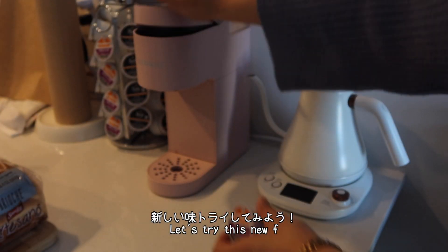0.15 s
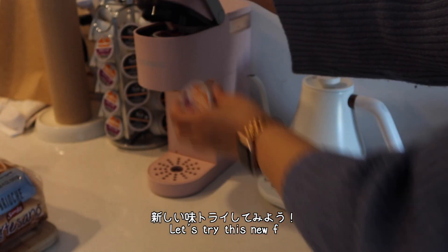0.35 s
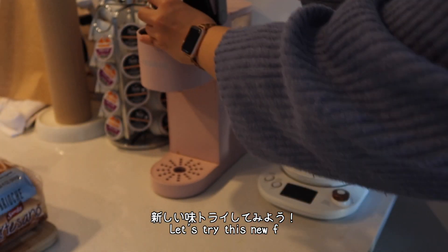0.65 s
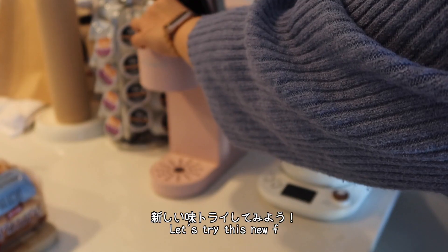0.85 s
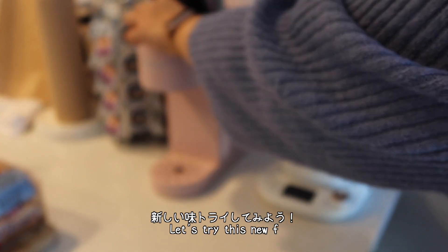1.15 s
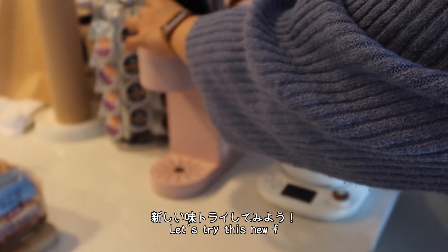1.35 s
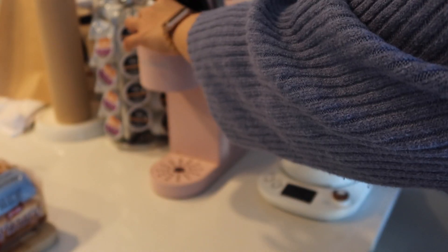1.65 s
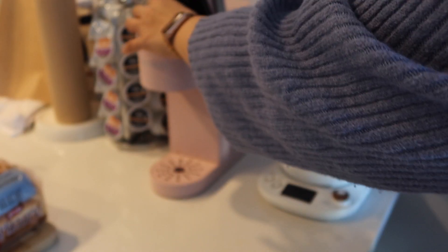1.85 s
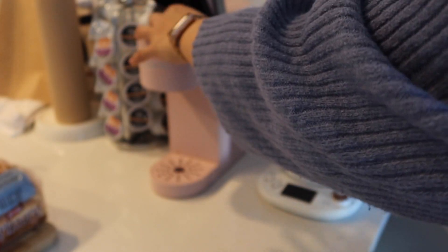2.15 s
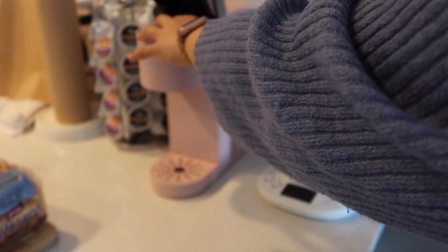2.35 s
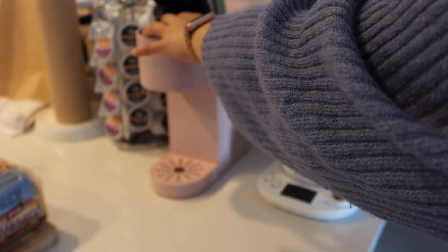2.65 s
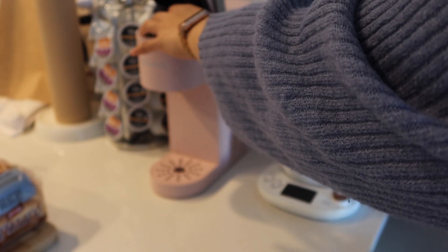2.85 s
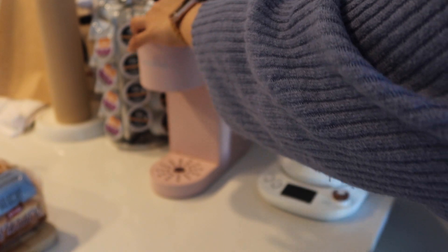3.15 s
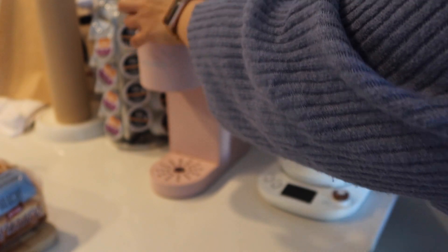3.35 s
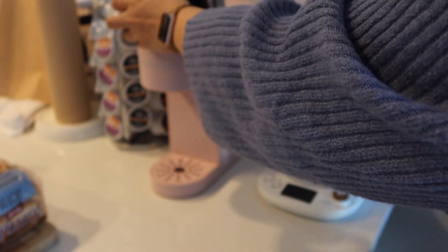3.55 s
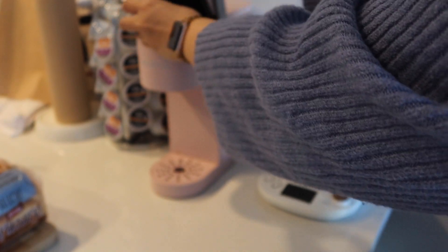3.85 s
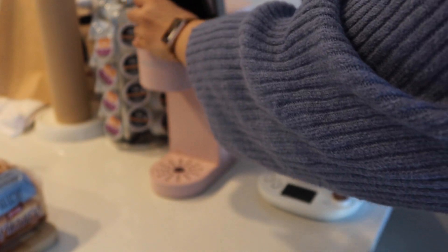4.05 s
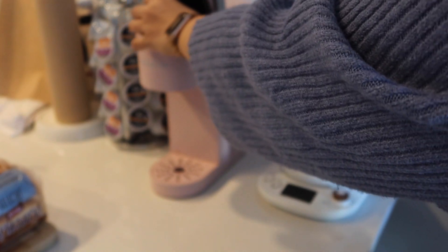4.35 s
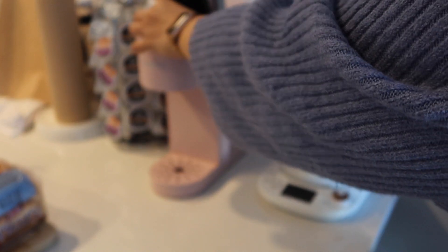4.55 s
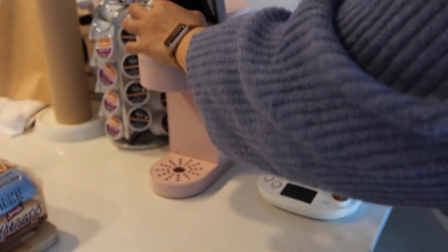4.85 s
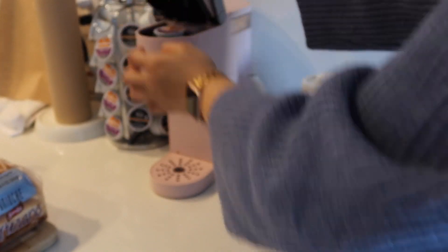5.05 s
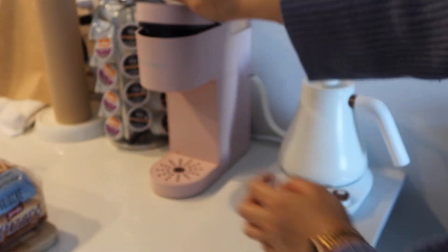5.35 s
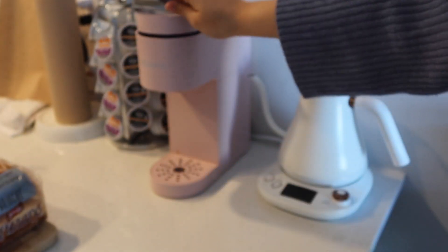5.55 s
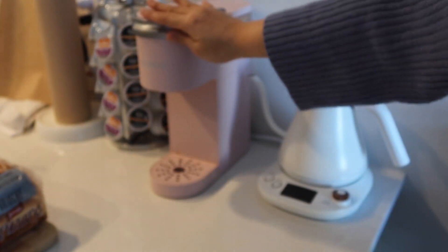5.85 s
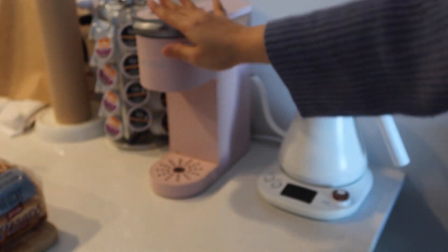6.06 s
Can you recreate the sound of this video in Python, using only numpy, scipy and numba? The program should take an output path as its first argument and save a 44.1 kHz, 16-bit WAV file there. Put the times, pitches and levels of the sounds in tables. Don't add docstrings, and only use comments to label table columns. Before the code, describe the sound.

Quiet low room hum in a hard-walled kitchen, stereo microphones about arm's length away. Faint plastic ticks start at once; at 0.1-0.3 s a loose lid rattles and slides over a hollow housing. At 0.6 s a clack, then at 0.7 s a strong dull thump as the lid is thrown open; its tail is chopped at about 0.75 s. Thin pod clicks and taps at 1.0-1.3 s, a soft knock near 1.6, then near quiet with faint ticks until 2.7. At 3.03 s the pod drops with a loud hollow knock, bouncing at 3.18 and 3.28. Light working taps follow at 3.4, 3.8-3.95, 4.2 and 4.65 s. Lid parts click sharply at 5.3-5.55, slide and thump at 5.7, and the latch snaps at 5.77 s, the loudest event, bright and brief, its short reverberant tail fading into hum.

```python
import sys
import numpy as np
from scipy import signal
from scipy.fft import rfft, irfft
from scipy.io import wavfile
from scipy.ndimage import uniform_filter1d
from numba import njit

SR = 44100
rng = np.random.default_rng(int(sys.argv[2]) if len(sys.argv) > 2 else 0)


def bounce(signal):
    frames = np.transpose(np.atleast_2d(signal))
    limited = np.clip(frames, -1, 1)
    pcm = np.round(limited * 32767).astype(np.int16)
    wavfile.write(sys.argv[1], SR, pcm)


def natural_amplitude(level_db):
    exponent = np.asarray(level_db, float) / 20
    return 10 ** exponent


N = 274302
T = np.arange(N) / SR


def shape(x, table):
    hz, db = np.transpose(table)
    f = np.fft.rfftfreq(len(x), 1 / SR) + 1
    return irfft(rfft(x) * natural_amplitude(np.interp(np.log(f), np.log(hz), db)), len(x))


def band(x, hz, width):
    return signal.lfilter(*signal.iirpeak(hz, hz / width, SR), x)


def unit(x):
    return x / np.sqrt(np.mean(x ** 2))


def walk(rate):
    k = int(SR / rate)
    steps = np.repeat(rng.standard_normal(N // k + 1), k)
    return 0.57 * uniform_filter1d(uniform_filter1d(steps, k), k)[:N]


def add(track, s, sound):
    i = int(s * SR)
    track[i:i + len(sound)] += sound[:N - i]


# f/Hz, level/dB per Hz
AIR = [(15, -50), (25, 6), (69, -8), (110, -8), (209, -7.5), (240, -10), (297, -3.5), (331, -16),
       (368, -8.5), (495, -15.5), (782, -17.5), (1170, -21), (1410, -22.5), (5010, -32.5), (15500, -50.5)]
# f/Hz, side minus mid level/dB
AIR_SIDE = [(60, -29), (110, -11), (200, -9.5), (380, -2.5), (700, -3.5), (1290, -1), (2380, -0.5),
            (4400, -1), (8120, -1), (15000, -1)]
# t/s, level/dB, width/s
SWELLS = [
    (0., -34, .08),
    (.9, -32.5, 0.3),
    (2.96, -52.5, 0.32),
    (4.97, -47, 0.2),
    (5.82, -59, 0.059),
]


def air():
    air_db, throb_db = -45, -56.5
    mid, side = (shape(rng.standard_normal(N), AIR) for _ in range(2))
    both = np.array([mid, shape(side, AIR_SIDE)])
    swell, out = walk(1.0), 0
    f = np.fft.rfftfreq(N, 1 / SR) + 1
    centres = np.arange(4, 14.6, .5)
    for k in range(len(centres)):
        share = np.interp(np.log2(f), centres, np.arange(len(centres)) == k)
        drift_db = 0.092 * swell + 0.43 * walk(5.5)
        out = out + irfft(rfft(both) * share, N) * natural_amplitude(drift_db)
    out = out * natural_amplitude(air_db) / np.sqrt(np.mean(out[0] ** 2))
    throb_hz = 75 + 4 * walk(2.2)
    throb = np.sqrt(2) * np.sin(2 * np.pi * np.cumsum(throb_hz) / SR) * natural_amplitude(0.62 * walk(7.93))
    swells = sum(natural_amplitude(db - 12.5) * np.exp(-((T - s) / width) ** 2) for s, db, width in SWELLS)
    out[0] += throb * (natural_amplitude(throb_db) + swells)
    return out


# f/Hz, t60/s, level/dB
KITCHEN = [(125, 0.53, -2), (263, 0.68, -11.5), (435, 0.52, -5), (1000, 0.49, -5.5), (2000, 0.48, -9),
           (3700, 0.51, -11), (7440, 0.35, -11.5), (13800, 0.17, -24)]
# f/Hz, side minus mid level/dB
KITCHEN_SIDE = [(100, -46), (1000, -27), (3000, -13.5), (8000, 1), (15000, 19)]


def kitchen(x):
    t, f = T[:SR], np.fft.rfftfreq(SR, 1 / SR) + 1
    centres = np.log([row[0] for row in KITCHEN])
    tails = np.zeros((2, SR))
    for k, (hz, t60, db) in enumerate(KITCHEN):
        share = np.interp(np.log(f), centres, np.arange(len(centres)) == k)
        noise = irfft(rfft(rng.standard_normal((2, SR))) * np.sqrt(share), SR)
        tails += noise * natural_amplitude(db - 24.0 - 60 * t / t60)
    tails *= np.clip(t / .02, 0, 1)
    tails *= natural_amplitude(3 * walk(250)[:SR] * np.exp(-t / .12))
    spectrum = rfft(tails)
    power = np.abs(spectrum) ** 2
    even = np.sqrt(uniform_filter1d(power, size=160) / uniform_filter1d(power, size=12))
    tails = irfft(spectrum * even, SR)
    tails[1] = shape(tails[1], KITCHEN_SIDE)
    return signal.fftconvolve(x[None], tails, axes=1)[:, :N]


# f/Hz, width/Hz, level/dB
HOUSING = [(236, 68, 2.5), (500, 52, -11.5), (756, 48, -2)]
# start t/s, peak t/s, end t/s, level/dB, brightness level/dB
SLIDES = [(-.02, 0.014, 0.078, -38.5, -5.5), (0.037, 0.051, 0.18, -34.5, -23),
          (0.077, 0.17, 0.3, -15, -20.5), (0.297, 0.543, 0.53, -35.5, -30), (.59, 0.644, 0.65, -33, -9),
          (0.692, 0.714, 0.7, -14, 3), (0.89, 1.054, 1.09, -36, -10), (1.063, 1.117, 1.3, -29.5, -18),
          (1.248, 1.577, 1.66, -35.5, -65), (3.26, 3.28, 3.49, -29.5, -22),
          (3.368, 3.388, 3.54, -31.5, -35), (3.816, 3.921, 3.94, -31.5, -50),
          (4.124, 4.175, 4.13, -33, -25), (4.53, 4.544, 4.58, -35.5, -20), (5.403, 5.455, 5.7, -23, -38),
          (5.694, 5.733, 5.75, -10, -40)]


def slides():
    slips = (rng.random(N) < 2500 / SR) * rng.standard_normal(N)
    slips = slips * natural_amplitude(1.64 * rng.exponential(size=N))
    slips = slips + 0.13 * rng.standard_normal(N)
    modes = [(-1) ** k * natural_amplitude(db) * band(slips, hz, 1.66 * w) for k, (hz, w, db) in enumerate(HOUSING)]
    body = unit(sum(modes))
    broad = unit(band(slips, 1000, 670))
    scratch = unit(band(band(slips, 2200, 6800), 3100, 5200))
    out = np.zeros(N)
    for start, peak, end, db, bright_db in SLIDES:
        rise_and_fall = np.interp(T, [start, peak, end], [0, 1, 0]) ** 2
        out += natural_amplitude(db - 11.5) * rise_and_fall * (body + 0.19 * broad + natural_amplitude(bright_db) * scratch)
    return out


def rings(table, push_cycles=0.36, split=0.037):
    out, t = np.zeros(N), T[:16384]
    for s, db, hz, t60 in table:
        trio = np.sin(2 * np.pi * hz * t)
        trio += 0.3 * np.sin(2 * np.pi * hz * (1 + split) * t)
        trio += 0.18 * np.sin(2 * np.pi * hz * (1 - 2.0 * split) * t)
        decay = natural_amplitude(db - 1.5 - 60 * t / max(t60, .004))
        add(out, s, decay * trio * (1 - np.exp(-t * hz / push_cycles)))
    return out


def struck(modes, hits):
    return rings([(s, db + peak_db, hz, t60) for s, db in hits for hz, peak_db, t60 in modes])


# t/s, peak level/dB, f/Hz
BOOMS = [
    (.166, -26.5, 251),
    (3.032, -38, 125),
    (3.421, -35, 135.4),
    (4.167, -34.5, 184.7),
    (5.773, -18, 396.7),
    (5.779, -25, 115),
]
# t/s, peak level/dB, f/Hz
HELD_THUMPS = [
    (.189, -14.5, 475),
    (.705, -3.5, 240),
    (.723, -15, 193),
    (1.157, -21.5, 212),
    (3.961, -21.5, 187),
    (4.653, -29.5, 193),
    (4.66, -22.5, 377),
]
# t/s, peak level/dB, f/Hz
FREE_THUMPS = [(.057, -26.5, 303), (.216, -28, 283), (.612, -17, 244), (.629, -22, 222), (.74, -23.5, 272),
               (1.125, -26.5, 388), (1.435, -30, 295), (3.03, -8.5, 415.6), (3.043, -16, 365),
               (3.188, -14, 397.4), (3.4, -31, 378), (3.775, -32.5, 214), (3.935, -27.5, 129),
               (5.453, -23, 436), (5.559, -27, 128), (5.711, -16.5, 268), (5.72, -12, 187),
               (6.118, -28, 182)]


def thumps():
    kinds = [(HELD_THUMPS, 0.037), (FREE_THUMPS, 0.092), (BOOMS, 0.23)]
    return rings([row + (t60,) for rows, t60 in kinds for row in rows], 0.43, -0.118)


# t/s, peak level/dB, f/Hz, t60/s
POD_RINGS = [(1.001, -17, 2000, 0.0056), (1.001, -26, 1240, 0.018), (1.003, -28, 672, 0.051),
             (1.113, -34, 3460, .025), (1.153, -20.5, 1206, .035), (1.155, -23, 1410, .03),
             (1.003, -27.5, 1170, 0.026), (1.153, -25.5, 2690, 0.033), (1.155, -32, 2830, .05),
             (1.583, -30.5, 653, 0.026), (3.389, -23, 1196, 0.025), (3.389, -26, 2000, .012),
             (3.773, -35, 556, .038), (3.962, -26.5, 554, 0.039), (4.158, -31, 1000, 0.014),
             (4.223, -14, 1126, 0.019), (4.224, -15.5, 2010, 0.003), (4.23, -30.5, 1230, 0.18),
             (4.649, -21, 1212, 0.048), (4.652, -26, 2860, 0.031), (4.653, -38, 3130, .02),
             (4.226, -30, 2500, 0.02), (4.655, -29.5, 1259, 0.2), (4.656, -37.5, 2943, 0.12),
             (4.655, -30, 610, 0.031)]


def pod():
    return rings(POD_RINGS)


# f/Hz, peak level/dB, t60/s
CUP_MODES = [(860, -15, 0.077), (662, -10, 0.012), (1480, -22.5, 0.049), (1230, -22, 0.063),
             (2430, -18, 0.0041)]
# t/s, level/dB
CUP_HITS = [
    (3.027, 2.2),
    (3.181, -6),
    (3.28, -15),
]


def cup():
    return struck(CUP_MODES, CUP_HITS)


# t/s, peak level/dB, f/Hz, t60/s
LID_RINGS = [(0, -45, 2560, 0.066), (0, -48, 5330, .09), (.106, -30.5, 3190, .024), (.2, -21, 3100, 0.015),
             (.2, -20, 6050, .017), (.606, -16.5, 860, 0.025), (.705, -9.5, 783, 0.028),
             (.7055, -3.5, 298, 0.0065), (5.294, -21, 1000, 0.05), (5.3, -30.5, 1350, 0.09),
             (.606, -23.5, 440, 0.075), (.72, -15.5, 433, 0.045), (.17, -24, 1006, 0.041),
             (5.294, -26, 2280, .042), (5.384, -4.5, 1530, 0.0031), (5.384, -9.5, 2315, 0.02),
             (5.412, -13, 1320, 0.02), (5.533, -10, 2760, 0.0058), (5.384, -8, 3480, .01),
             (5.71, -21, 3640, .03), (5.745, -18, 2130, .014)]


def lid():
    return rings(LID_RINGS)


COLOUR_HZ = [200, 800, 2100, 4400, 9000, 16000]


def chatter(rows, top, t60):
    out, t, lead = np.zeros(N), T[:2048], 64
    for s, db, mid_db, high_db in rows:
        top_db = high_db + top
        decay = natural_amplitude(-60 * t / max(t60, .002)) * (1 - np.exp(-t / 0.00011))
        burst = rfft(rng.standard_normal(len(t)) * decay)
        burst = irfft(burst / uniform_filter1d(np.abs(burst), size=3))
        burst = np.roll(burst * (t < .035), lead)
        colour_db = np.array([0, 0, mid_db, high_db, top_db, top_db]) + [-8.0, -1, 0.0, -7.0, -7.5, -22.5]
        add(out, s - lead / SR, natural_amplitude(db + 27) * shape(burst, np.transpose([COLOUR_HZ, colour_db])))
    return out


# t/s, body level/dB, mid minus body level/dB, high minus body level/dB
TICKS = [(.107, -28, -3, -0.5), (3.036, -25, 10.5, -6.5), (3.49, -37.5, -5, -4), (.641, -19.5, 2, -5),
         (.65, -28, -23, -4), (1.001, -20.5, -1.5, -15.5), (1.113, -15.5, -9, -18), (1.153, -17, -18, -21),
         (1.959, -43, -24, -11), (2.256, -29, -13.5, -15), (2.642, -32, -6, -14), (3.18, -14, -16.5, -30.5),
         (3.28, -15, -18, -21.5), (3.962, -20.5, -14, -28), (4.069, -41, 1, -26), (4.558, -43, 1, -10),
         (4.601, -34, -11, -23), (4.842, -54, -15, -18), (5.369, -37, -11, 8.5), (5.458, -17, 5.5, -5.5),
         (5.546, -18.5, -1.5, -8.5)]


def ticks():
    return chatter(TICKS, top=-3, t60=0.028)


# t/s, body level/dB, mid minus body level/dB, high minus body level/dB
RATTLES = [(.158, -11, -8, -7), (.179, -5.5, -9, -8.5), (.6, -11.5, -10, -21), (.696, -16, 2, -10),
           (1.286, -19, -18, -16), (3.389, -21, -7, -27), (3.772, -19, -19.5, -33), (3.942, -20, -16, -27),
           (4.223, -19.5, -36, -19), (4.65, -19.5, -7.5, -7), (5.293, -17.5, -0.5, -2.5),
           (5.384, -10, 5.5, -1.5), (5.71, -7, -14.5, -8.5), (5.768, -3.5, -20, 1)]


def rattles():
    return chatter(RATTLES, top=-14.5, t60=0.075)


# t/s, body level/dB, mid minus body level/dB, high minus body level/dB
KNOCKS = [(.059, -31, -11, -1.5), (.119, -24, -12, -10), (.2, -15.5, -4.5, 8), (.438, -30.5, -1, -8),
          (.576, -29.5, -8, -14), (.605, -13, -7.5, -13.5), (.703, -2.5, -17, -16.5),
          (.751, -15.5, -10, -32), (1.562, -23.5, -24, -25), (3.026, -1.5, -18, -20),
          (4.158, -37, -11, -22), (5.377, -26, 10, -9), (5.532, -22.5, 4, 6), (5.719, -9, -14, -16),
          (3.005, -12.5, -19, -16), (5.7725, 3.5, -2, 3)]


def knocks():
    return chatter(KNOCKS, top=-20, t60=0.023)


# f/Hz, peak level/dB, t60/s
LATCH_MODES = [(4715, 12.5, 0.0089), (5220, 7.5, 0.012), (5950, 13, 0.0041), (663, 7.5, 0.0098),
               (1350, 7, 0.01), (990, 2, 0.0095)]
# t/s, level/dB
LATCH_HITS = [
    (5.7726, -0.4),
]


def latch():
    return struck(LATCH_MODES, LATCH_HITS)


def scene():
    change_s = .755
    contacts = ticks() + rattles() + knocks()
    direct = slides() + thumps() + pod() + cup() + lid() + contacts + latch()
    direct = signal.sosfilt(signal.butter(2, 90, "high", fs=SR, output="sos"), direct)
    first = np.clip((change_s - T) / 0.0072, 0, 1)
    second = T > change_s
    tails = kitchen(direct * first) * first + kitchen(direct * second)
    lean = 0.28 * np.gradient(direct)
    mid, side = np.array([direct, lean]) * (first + second) + tails + air()
    return np.array([mid + side, mid - side])


@njit
def follow(x, attack, release):
    e, out = 0., np.empty(len(x))
    for i in range(len(x)):
        e += (x[i] - e) * (attack if x[i] > e else release)
        out[i] = e
    return out


def roll_off(x):
    return signal.sosfilt(signal.butter(12, 15740, fs=SR, output="sos"), x)


def record(dry):
    dry = signal.sosfilt(signal.butter(4, 36, "high", fs=SR, output="sos"), dry)
    attack_s, release_s, threshold = 0.0053, 0.051, 0.29
    peak = follow(np.abs(dry).max(axis=0), 1 / (attack_s * SR), 1 / (release_s * SR))
    gain = np.minimum(1, (threshold / (peak + 1e-9)) ** 1.53)
    return roll_off(np.clip(dry * gain, -1, 1))


dry = scene()
out = record(dry)
bounce(out)
```